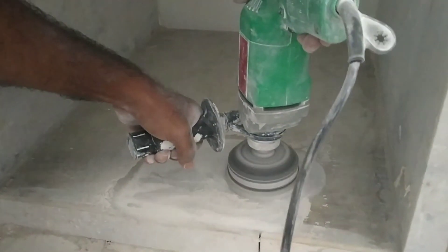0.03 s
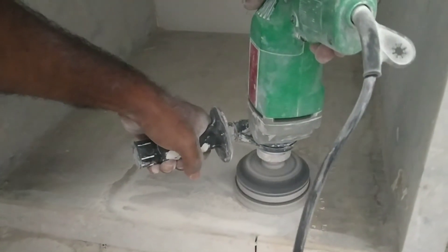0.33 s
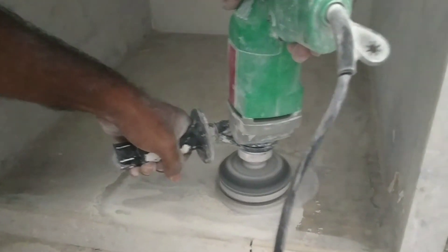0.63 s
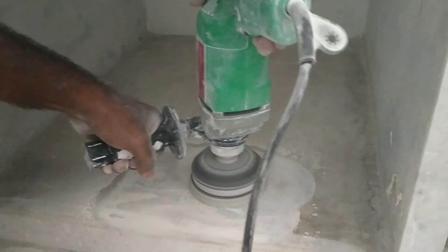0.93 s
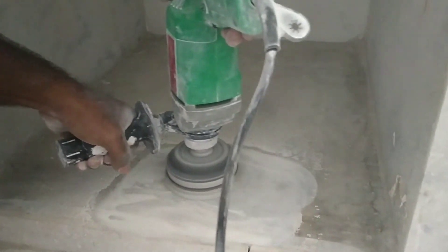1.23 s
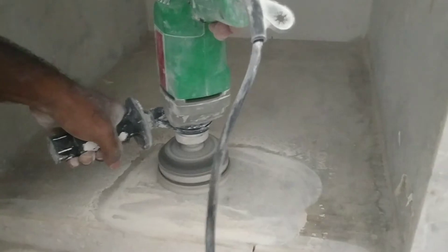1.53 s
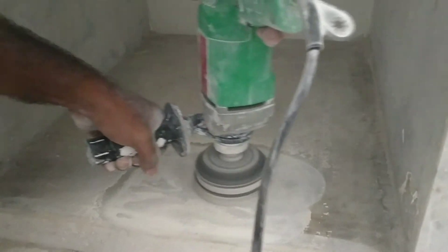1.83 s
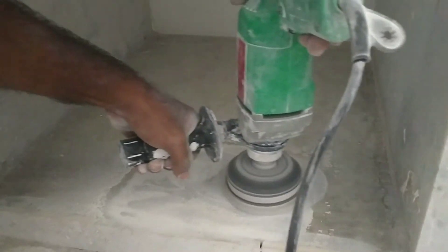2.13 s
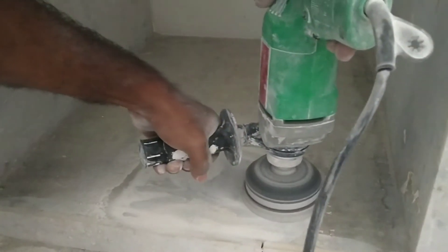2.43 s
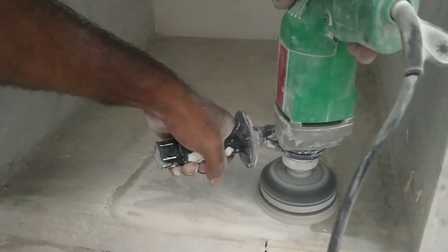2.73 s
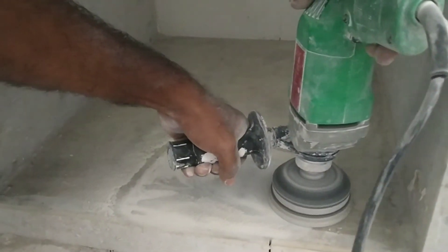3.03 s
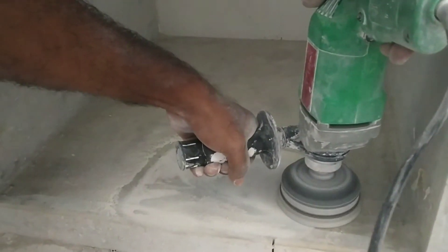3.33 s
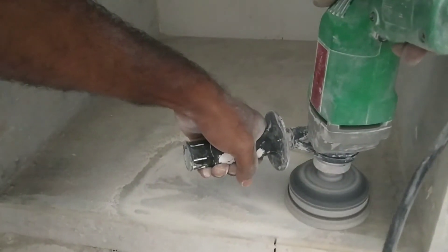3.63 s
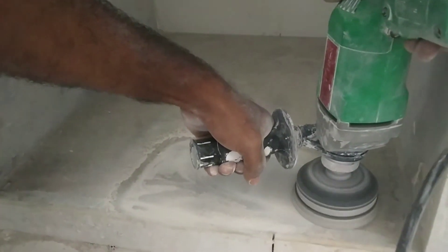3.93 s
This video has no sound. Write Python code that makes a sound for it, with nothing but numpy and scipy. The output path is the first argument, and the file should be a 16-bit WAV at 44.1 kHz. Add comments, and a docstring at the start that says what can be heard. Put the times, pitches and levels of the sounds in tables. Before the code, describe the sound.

An electric grinder whines steadily, its spinning pad scraping over stone close by.

```python
"""The warbling whine of an electric polisher, grinding a stone ledge close by in a bare concrete alcove.
Its seven-bladed cooling fan follows the motor's speed, warbled by the mains and the geared spindle.
The pad scrapes over grit and rings the head; rotor and bearing add thinner tones; air rushes from
the vents. The tones swell and fade in each microphone as the tool moves between the walls."""
import sys
import numpy as np
from scipy import signal
from scipy.fft import rfft, irfft
from scipy.io import wavfile

SR = 44100
rng = np.random.default_rng(int(sys.argv[2]) if len(sys.argv) > 2 else 0)


def master_out(mix):
    """Clip the mix to full scale and print it as 16-bit PCM to the path in sys.argv[1]."""
    frames = np.transpose(np.atleast_2d(mix))
    ceiling = np.clip(frames, -1, 1)
    pcm = np.round(ceiling * 32767).astype(np.int16)
    wavfile.write(sys.argv[1], SR, pcm)


N = 176400
T = np.arange(N) / SR
BLADES, SPINDLE_RATIO = 7, .211  # spindle turns per motor turn
MAINS_RIPPLE_HZ, MAINS_SWING_RAD = 100, .12  # the swing is that of the blade tone's phase
FADE_PER_S, FAINT_ECHO = 5, .05  # wall echoes: how fast they shift, and their share in a steady tone
HUM_PAN_DB = 3.5  # every pan is left microphone minus right


def fan(turn, mains):
    """The blade tone and four overtones, warbled and pulsed by torque ripple and each spindle turn."""
    # The whine and its harmonics 2 to 5. Each row: time in seconds, level in dB, pan in dB.
    fundamental = [(0.0, -22, 5), (0.18, -20.5, 1), (0.33, -18, 9), (0.54, -24.5, -1), (0.73, -17.5, 15),
                   (0.91, -19.5, 6), (1.05, -19, 9), (1.16, -18, 6), (1.27, -17.5, 11), (1.34, -20.5, 13),
                   (1.41, -24, 6), (1.56, -19.5, 18), (1.89, -17.5, -1), (2.0, -16.0, 3),
                   (2.18, -18.5, -6.5), (2.47, -13.5, 2.5), (2.76, -17.5, 9.5), (2.98, -15.5, 5.5),
                   (4.0, -16, 0)]
    second = [(0.0, -21.0, 8), (0.22, -29.0, 0), (0.44, -23.0, 0), (1.12, -26.5, 3), (1.27, -28.5, -5),
              (1.41, -26.0, 4), (1.6, -32.5, 7), (1.74, -27.5, 9), (1.92, -27.5, -2), (2.21, -27.0, 13),
              (2.39, -26.5, 5), (2.54, -31.5, 2), (2.76, -25.0, 6), (3.01, -31.5, -1), (3.23, -24.5, 0),
              (4.0, -26.5, 2)]
    third = [(0.0, -30.5, -3), (0.22, -21.5, -11), (0.54, -30, -1), (0.87, -30, -13), (0.98, -22.5, -24),
             (1.16, -26, -9), (1.81, -28.5, -5), (1.96, -25.0, -16), (2.1, -29, -5), (2.47, -26.5, -15),
             (2.61, -37, -4), (2.83, -23.5, -10), (3.66, -30.5, 3), (4.0, -26.5, 1)]
    fourth = [(0.0, -29.5, -8), (0.69, -20.5, -6), (1.05, -31, -4), (1.27, -23.5, -12), (1.52, -27.5, -1),
              (1.67, -21, -13), (2.03, -38, 8), (2.32, -29, -1), (2.58, -41, -0.5), (2.72, -21, -16),
              (3.23, -34, 7), (3.41, -26, 3), (3.56, -32.5, 14), (4.0, -23.5, -5)]
    fifth = [(0.0, -22, -9), (0.58, -32, 6), (0.98, -19, -3), (1.09, -24, -2), (1.23, -19, -13),
             (1.71, -25, -6), (2.1, -29, 7), (2.43, -26.5, -11), (2.61, -37, -13), (2.76, -22, -6),
             (2.98, -32, -2), (3.45, -20, -14), (3.85, -34, 2), (4.0, -32.0, -2)]
    # The whine shifts as the tool moves. Each row: time in seconds, lead of the left side in radians.
    whine_lead = [(0, 1), (.38, -2.3), (.62, -0.5), (.88, -1), (1.12, 1.9), (1.38, 1.8), (1.62, 4.5),
                  (2.12, 4.5), (2.38, 7.5), (2.62, 6), (2.88, 7.5), (4, 6.5)]
    spindle = SPINDLE_RATIO * turn
    blade = BLADES * turn + MAINS_SWING_RAD * np.sin(mains) + .16 * np.sin(spindle) + .2 * drift(11)

    def partial(order, lead, echo, throb=.34, flutter=.28):
        """One harmonic, throbbing with mains and spindle and fluttering with turbulence at the blades."""
        lag = np.array([drift(FADE_PER_S), drift(FADE_PER_S)])
        pulsing = .7 * np.sin(mains + lag) + .99 * np.sin(spindle + lag - .5)
        turbulence = np.array([drift(27), drift(27)])
        return rms_one((1 + throb * pulsing + flutter * turbulence) * tone(order * blade, echo, lead))

    db, pan = in_time(fundamental)
    # Where the whine fades, its throb and flutter take a larger share.
    rough = (from_db(db.mean() - db) / panned(pan)) ** .56
    whine = partial(1, in_time(whine_lead)[0], FAINT_ECHO, throb=.31 * rough, flutter=.12 * rough)
    whine *= from_db(db) * panned(pan)
    db, pan = in_time(second)
    octave = from_db(db) * panned(pan) * partial(2, drift(FADE_PER_S), FAINT_ECHO)
    shriek = 0
    for order, curve in enumerate((third, fourth, fifth), 3):
        db, pan = in_time(curve)
        shriek += from_db(db) * panned(pan) * partial(order, .88 * drift(FADE_PER_S), echo=.35)
    return whine + octave + shriek


def pad(turn):
    """Grit under the pad makes a broad scrape, rings the head and growls; the pad's wobble drones."""
    # The scrape's colour. Each row: frequency in Hz, relative density in dB, pan in dB.
    scrape_colour = [(30, -109, 2), (55, -101, 2), (80, -97, 2), (120, -85.5, -1), (150, -80, 7),
                     (173.7, -66, 4), (222, -70.5, -1), (280, -70.5, 4), (480, -63.5, 5), (616, -69, 1),
                     (755, -63.5, 5), (836, -57.5, 2.5), (1390, -56.5, 3.5), (1550, -54, 6),
                     (2010, -55, 1.5), (2430, -61, 2), (5100, -77, -12)]
    # Resonances of head and pad. Each row: frequency in Hz, width in Hz, relative level in dB, pan in dB.
    head_modes = [(988, 24, -32.5, 2), (1055, 18, -35, 11), (1115, 24, -36, 25), (1628, 28, -36.5, 19),
                  (1671, 30, -32.5, 9)]
    # Four level curves. Each row: time in seconds, gain in dB.
    contact_level = [(0, 1), (.4, 1), (.75, 0), (1.2, -1), (1.5, 0.5), (1.9, 1), (2.3, 0.5), (3, -0.5),
                     (4, 1)]  # scrape and ringing together
    ring_level = [(0, -1.5), (.4, 3), (.8, -2), (1.3, 1), (1.9, -3.5), (2.3, 2), (3, 0), (4, 1.5)]  # how hard the head rings
    growl_level = [(0, -42), (.8, -43.5), (1.2, -41), (1.45, -30), (1.8, -46), (2.1, -55), (4, -48)]  # loudest at the far left of the pad's sweep
    drone_level = [(0, -74), (1, -94), (1.4, -55), (1.7, -53), (1.85, -46), (2.1, -39.5), (2.3, -50),
                   (3, -59), (4, -67)]
    scrape = stereo_noise(alcove(grit()), scrape_colour, [(hz, pan) for hz, _, pan in scrape_colour])
    mid, side = alcove(grit())
    ring_band = signal.butter(2, [654, 2000], "band", fs=SR, output="sos")
    blows = signal.sosfilt(ring_band, mid + .5 * side * np.array([[1], [-1]]))
    rings = sum(from_db(db) * panned(pan) * resonate(blows, hz, width)
                for hz, width, db, pan in head_modes)
    rings *= gain_curve(ring_level)
    growl = gain_curve(growl_level) * panned(9) * resonate(blows, hz=768, width_hz=26)
    wobble = np.sin(2 * SPINDLE_RATIO * turn + .48 * drift(9.7))  # twice per spindle turn
    drone = gain_curve(drone_level) * panned(HUM_PAN_DB) * rms_one(wobble)
    return gain_curve(contact_level) * (scrape + rings) + growl + drone


def grit(impacts_per_s=5000, spread_db=3):
    """Two dense streams of tiny impacts of uneven size."""
    sizes = from_db(spread_db * np.minimum(rng.exponential(1, (2, N)), 5))
    signs = rng.choice([-1, 1], (2, N))
    hits = rng.random((2, N)) < impacts_per_s / SR
    return rms_one(sizes * signs * hits)


def rotor(turn, mains):
    """Unbalance hum, a singing bearing and the whirr of the drive, all tied to the motor's speed."""
    # Whirr of rotor, gears and bearings. Each entry: a tone's multiple of the motor's speed.
    whirr_orders = [2.76, 5, 5.3, 7.44, 8, 9, 10, 18.24, 22, 27, 30, 36, 37]
    # The same tones in order. Each row: level in dB, pan in dB.
    whirr_mix = [(-34, 10), (-39.5, 17), (-35, 6), (-36.5, -1), (-44, -8), (-44, -13), (-52, -8), (-44, 0),
                 (-56, -7), (-57, -7), (-62, -8), (-46, -5), (-49, -1)]
    # The hum holds on; the bearing sings, then fades. Each row: time in seconds, level in dB.
    hum_level = [(0, -41.5), (.5, -37), (1, -38.5), (1.3, -43.5), (1.8, -37.5), (2.3, -36), (3, -36),
                 (4, -35.5)]
    bearing_level = [(0, -35), (.2, -29.5), (.68, -23.5), (.97, -38.5), (1.38, -24), (1.62, -35),
                     (1.8, -30.5), (2, -49), (2.6, -40), (4, -43)]
    angle = turn + MAINS_SWING_RAD / BLADES * np.sin(mains)
    hum = gain_curve(hum_level) * panned(HUM_PAN_DB) * tone(angle, FAINT_ECHO)
    slip_rad = .25 * drift(33)
    bearing = gain_curve(bearing_level) * panned(3) * tone(5.52 * angle + slip_rad, FAINT_ECHO)
    whirr = sum(from_db(db) * panned(pan) * tone(order * angle + .64 * drift(7.2), echo=1)
                for order, (db, pan) in zip(whirr_orders, whirr_mix))
    return hum + bearing + whirr


def air(turn, mains):
    """Hiss from the vents, pulsing slightly with the mains and the spindle; its treble flickers."""
    # Cooling air and the hiss of the abrasive. Each row: frequency in Hz, relative density in dB.
    air_colour = [(1000, -98), (2230, -70), (2500, -66.5), (2950, -51.5), (3500, -57), (3900, -54.5),
                  (4700, -56.5), (6000, -60), (6600, -65.5), (7400, -60.5), (10500, -62.5), (11700, -63.5),
                  (12500, -61.5), (15700, -63.5)]
    # The top of the hiss sits to the right. Each row: frequency in Hz, pan in dB.
    air_pan = [(1000, 3), (3000, 0), (6000, 0), (8000, -4), (10500, -2.5), (12600, -8), (15500, -2)]
    # The rush swells gently. Each row: time in seconds, gain in dB.
    air_level = [(0, -1), (.35, 0.5), (.8, 0.5), (1.2, -2.5), (1.5, .5), (2, -0.5), (2.5, -0.5), (3.2, -1),
                 (4, -2)]
    pulse = 1 + .065 * np.sin(mains) + .012 * np.sin(SPINDLE_RATIO * turn)
    rush = stereo_noise(alcove(rng.standard_normal((2, N))), air_colour, air_pan)
    hiss = signal.sosfilt(signal.butter(2, 600, "high", fs=SR, output="sos"), rush)
    treble = signal.sosfiltfilt(signal.butter(6, 5900, "high", fs=SR, output="sos"), hiss)
    flicker = .3 * drift(29)
    return pulse * gain_curve(air_level) * (hiss + flicker * treble)


def alcove(pair, decay_s=.027, echo_share=.66):
    """Add a short, dense spray of echoes from the near walls; the sum has unit power."""
    t = T[:SR // 10]
    walls = rng.standard_normal((2, len(t))) * np.exp(-t / decay_s)
    walls /= np.sqrt(np.sum(walls ** 2, axis=1, keepdims=True))
    return rms_one(pair + echo_share * signal.fftconvolve(pair, walls, axes=1)[:, :N])


def tone(phase, echo, lead=0):
    """A tone plus its wall echoes, whose sum shifts at each microphone as the tool moves."""
    channels = []
    for arrival in (phase + lead / 2, phase - lead / 2):
        reflected = drift(FADE_PER_S) * np.sin(arrival) + drift(FADE_PER_S) * np.cos(arrival)
        channels.append(rms_one(np.sin(arrival) + echo * reflected))
    return np.array(channels)


def stereo_noise(pair, colour, pans):
    """Colour two unrelated noises and mix them into partly alike left and right."""
    # How alike the two microphones sound. Each row: frequency in Hz, correlation.
    likeness = [(60, 0.3), (170, 0.91), (450, 0.76), (750, 0.64), (1200, 0.29), (2000, 0.25), (3300, 0.21),
                (5500, 0), (9000, 0.27), (15000, 0.18)]
    hz = np.arange(N // 2 + 1) * SR / N
    alike = at_hz(likeness, hz)
    mid, side = rfft(pair)
    spectra = np.sqrt((1 + alike) / 2) * mid + np.sqrt((1 - alike) / 2) * side * [[1], [-1]]
    return irfft(spectra * from_db(at_hz(colour, hz)) * panned(at_hz(pans, hz)) * np.sqrt(SR / 2), N)


def resonate(x, hz, width_hz):
    """One resonance, at unit power."""
    r = np.exp(-np.pi * width_hz / SR)
    return rms_one(signal.lfilter([1, 0, -1], [1, -2 * r * np.cos(2 * np.pi * hz / SR), r * r], x))


def drift(rate_hz):
    """A smooth random wander with a spread of about 1."""
    hop, settle = 100, 1000  # samples per step, steps for the filter to settle
    r = np.exp(-2 * np.pi * rate_hz * hop / SR)
    steps = rng.standard_normal(N // hop + settle + 2)
    slow = signal.lfilter([1], [1, -2 * r, r * r], steps)[settle:]
    return np.interp(np.arange(N) / hop, np.arange(len(slow)), rms_one(slow))


def from_db(db):
    """Decibels to gain."""
    return 10 ** (np.asarray(db) / 20)


def rms_one(x):
    """Scale to unit power."""
    return x / np.sqrt(np.mean(np.abs(x) ** 2) + 1e-20)


def in_time(rows):
    """Each column of a curve at every sample."""
    seconds, *columns = np.transpose(rows)
    return [np.interp(T, seconds, column) for column in columns]


def gain_curve(rows):
    """A curve in dB as a gain at every sample."""
    return from_db(in_time(rows)[0])


def at_hz(rows, hz):
    """A spectrum's first column of values at the given frequencies."""
    row_hz, values = np.transpose(rows)[:2]
    return np.interp(np.log(hz + 1), np.log(row_hz), values)


def panned(pan_db):
    """Left and right gains of constant power."""
    gains = from_db(np.array([[.5], [-.5]]) * pan_db)
    return gains / np.sqrt(np.mean(gains ** 2, axis=0))


def scene():
    """The motor's angle and the mains ripple tie the parts of the tool together."""
    # The motor speeds up as the load eases. Each row: time in seconds, turns per second.
    motor_speed = [(0, 393.1), (.25, 393.8), (.52, 395.8), (.75, 395.7), (.93, 396.5), (1.12, 395.9),
                   (1.3, 396.2), (1.4, 398.2), (1.53, 402), (1.8, 403.2), (2, 405.6), (2.25, 406.2),
                   (2.58, 406.3), (2.8, 404.7), (3.5, 401.2), (3.8, 400), (4, 398.5)]
    turn = 2 * np.pi * np.cumsum(in_time(motor_speed)[0]) / SR
    mains = 2 * np.pi * MAINS_RIPPLE_HZ * T
    return fan(turn, mains) + rotor(turn, mains) + pad(turn) + air(turn, mains)


def record(dry):
    """Both channels are cut steeply above 15750 Hz."""
    return signal.sosfilt(signal.ellip(12, .1, 80, 15750, fs=SR, output="sos"), dry)


dry = scene()
out = record(dry)
master_out(out)
```